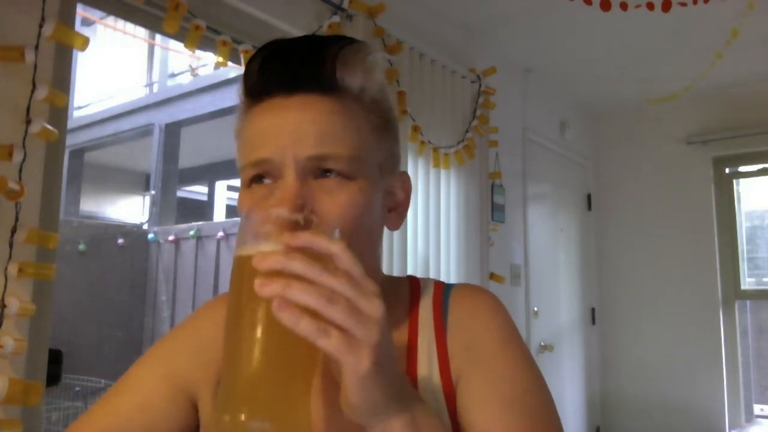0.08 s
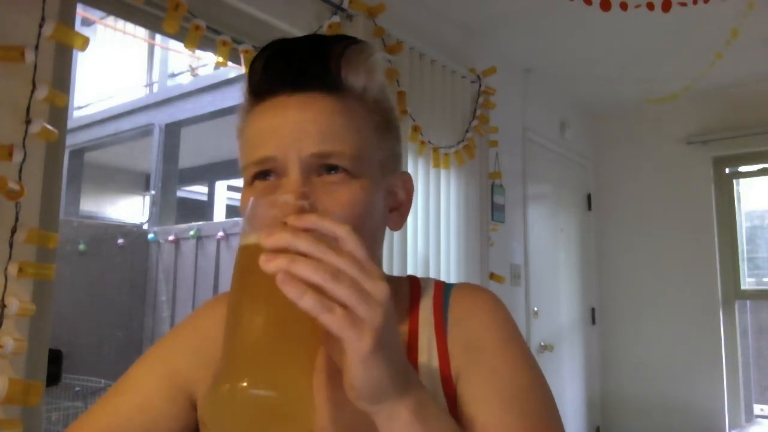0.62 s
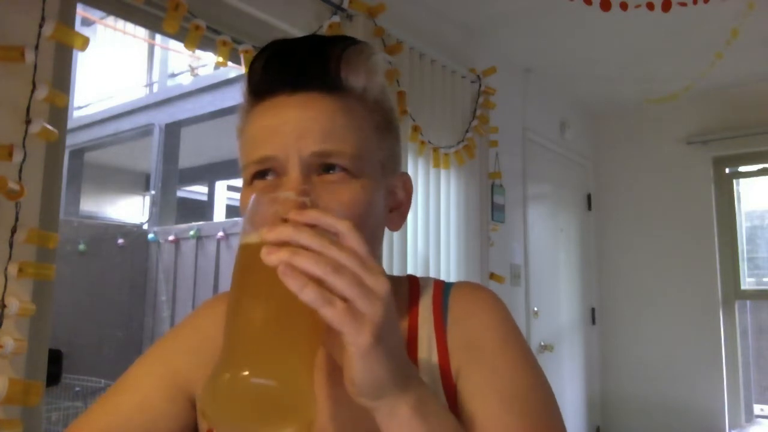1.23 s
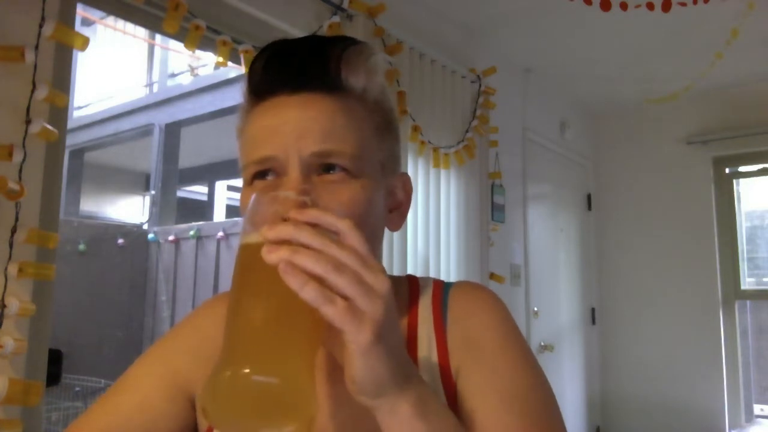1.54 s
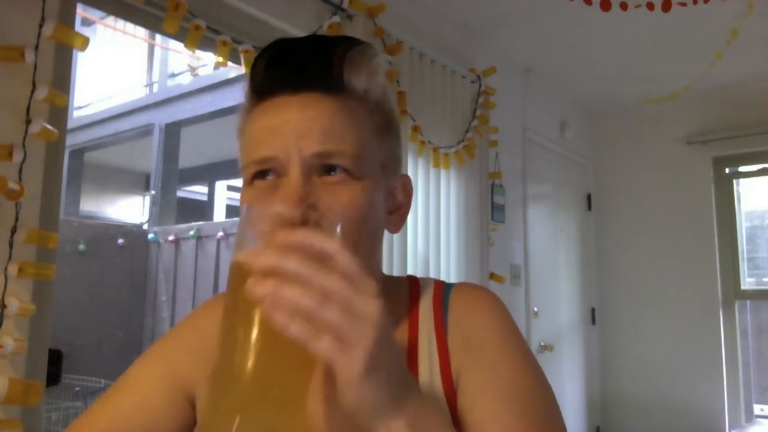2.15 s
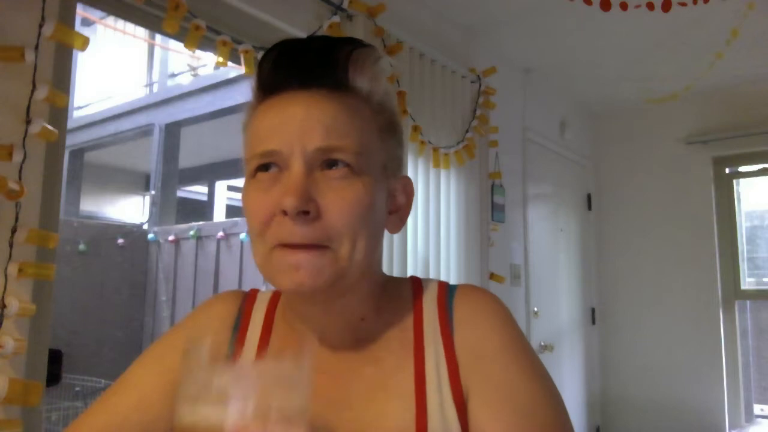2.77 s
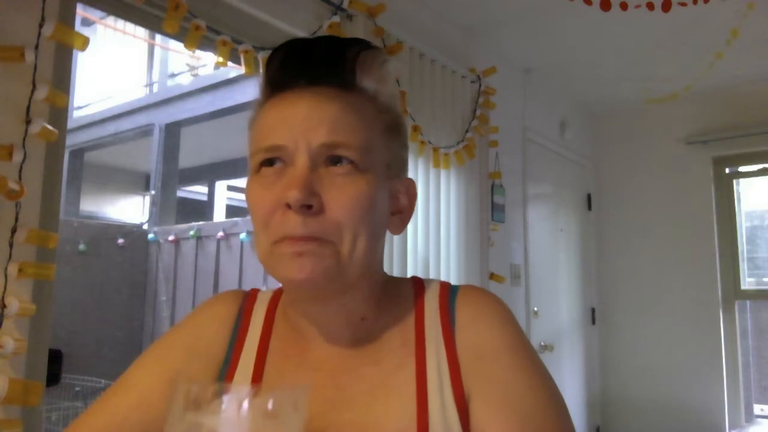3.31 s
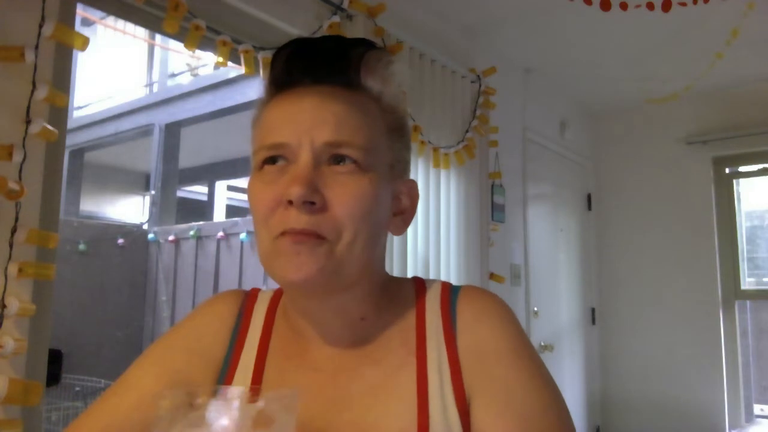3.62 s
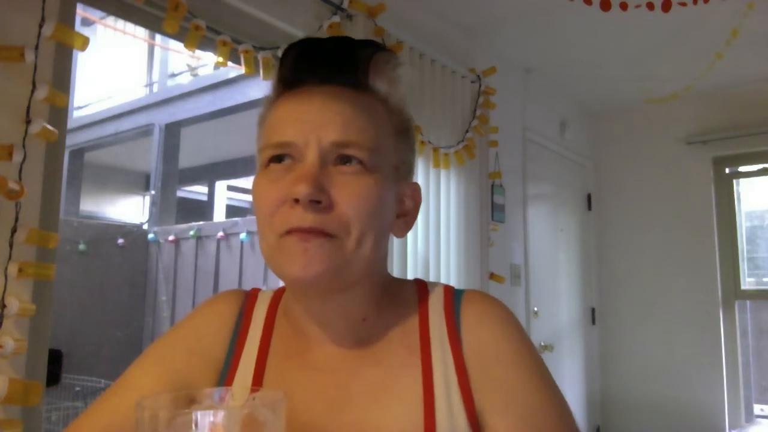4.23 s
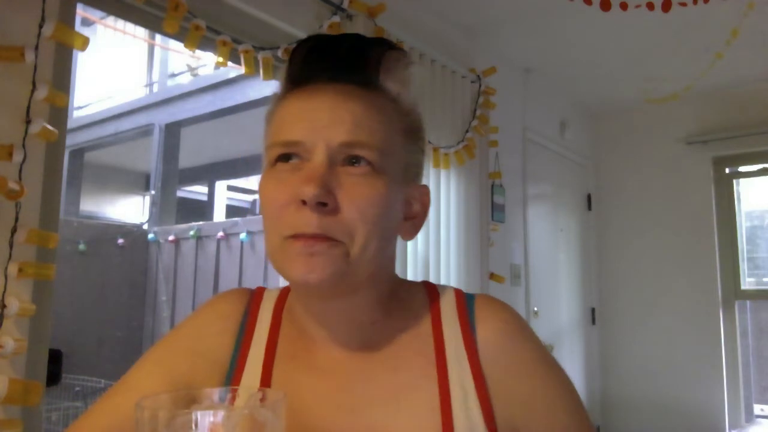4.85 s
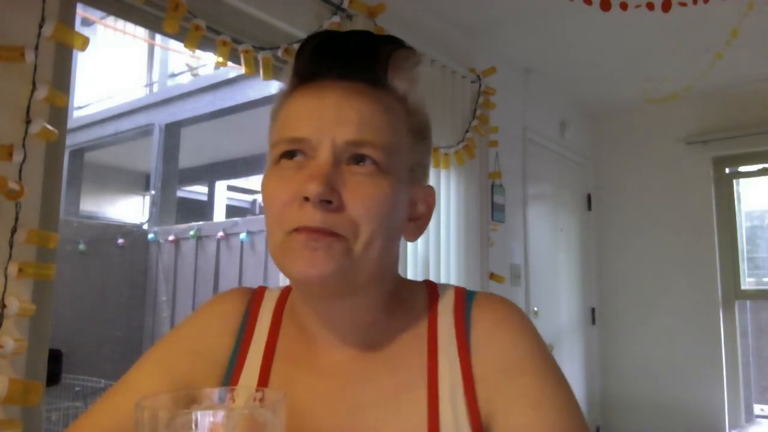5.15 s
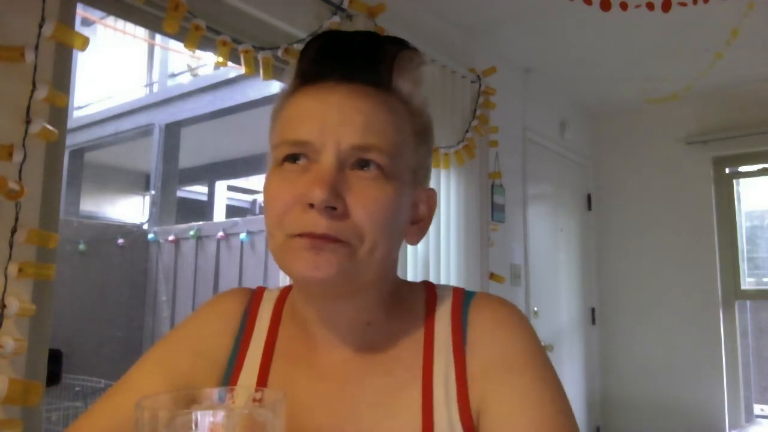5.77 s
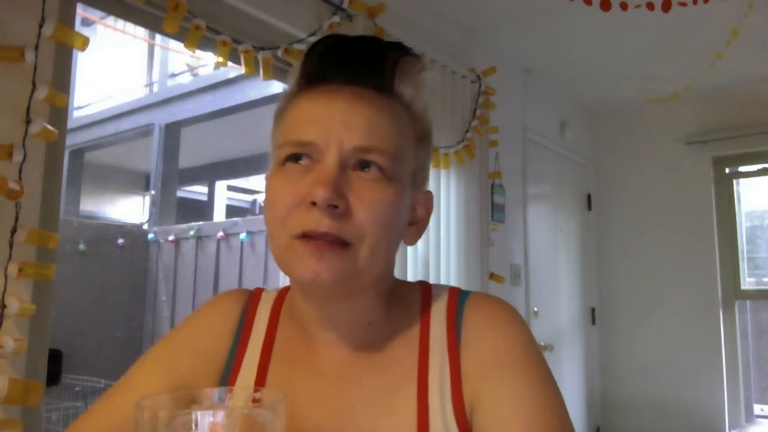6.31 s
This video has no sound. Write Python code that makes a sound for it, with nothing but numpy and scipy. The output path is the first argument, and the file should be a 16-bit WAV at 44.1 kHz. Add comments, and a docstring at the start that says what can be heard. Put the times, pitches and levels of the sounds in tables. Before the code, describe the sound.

A small computer fan whirs softly in a quiet room, with a very faint, high electronic whine. About three seconds in, a full drinking glass is set down on a wooden table with one loud, sharp knock, briefly overloading the nearby microphone. The tabletop rings for an instant and the room answers briefly. The fan carries on, and near the end comes one tiny, very high tick.

```python
"""A quiet room, heard from a computer's microphone close to a table top.
From the start a small fan whirs and the electronics whine faintly, held down a little by a noise gate.
About three seconds in, a full drinking glass is set down once, close by. The blow runs through the top as
a bending wave, briefly overloads the microphone and opens the gate; the glass clicks, the room answers
and the top rings. The gate closes again, and near the end comes one tiny, very high tick."""
import sys
import numpy as np
from scipy import signal
from scipy.fft import rfft, irfft
from scipy.io import wavfile

SR = 44100
rng = np.random.default_rng(int(sys.argv[2]) if len(sys.argv) > 2 else 0)


def materialize(psi):
    """Save the field psi as 16-bit PCM at rate SR to the path in sys.argv[1].

    A 1-D psi becomes a single channel; in a 2-D psi each row is a channel.
    """
    bounded = np.clip(np.atleast_2d(psi).T, -1, 1)
    quanta = np.round(bounded * 32767).astype(np.int16)
    wavfile.write(sys.argv[1], SR, quanta)


N = 290574
KNOCK_S = 3.11515  # the glass meets the table


def undb(db):
    """Decibels to gain."""
    return 10 ** (np.asarray(db) / 20)


def curve_at(points, hz):
    """A table of (pitch_hz, value) joined by straight lines on a log-frequency axis."""
    pitch_hz, value = np.transpose(points)
    return np.interp(np.log(np.maximum(hz, 1)), np.log(pitch_hz), value)


def bins(x):
    """Frequencies of the spectrum of x."""
    return np.fft.rfftfreq(len(x), 1 / SR)


def coloured_noise(points):
    """Noise with a spectrum of (pitch_hz, level_db)."""
    white = rng.standard_normal(N)
    return irfft(rfft(white) * undb(curve_at(points, bins(white))), N)


def at_rms(x, db):
    """Set the rms level."""
    return x * undb(db) / np.std(x)


def since(start_s):
    """Seconds gone by since start_s, zero before."""
    return np.maximum(np.arange(N) / SR - start_s, 0)


def fade(t, t60_s):
    """Free decay, 60 dB in t60_s."""
    return np.exp(-np.log(1000) * t / t60_s)


def ring(modes, t):
    """Decaying modes; neighbours move in opposite senses."""
    return sum((-1) ** k * undb(db) * np.sin(2 * np.pi * hz * t) * fade(t, t60_s)
               for k, (hz, db, t60_s) in enumerate(modes))


# Spectrum of the fan's rush of air: pitch_hz, relative_db
FAN_AIR = [(30, -26), (60, -16), (110, -6), (300, 0), (450, -.5), (800, -3.5), (1120, -2), (1450, -5),
           (1900, 1), (2800, -5), (3800, -5), (6000, -16.5), (10500, -27.5), (15000, -26)]
# The fan's tones, blade tone first: cycles_per_turn
FAN_TONES = (3, 12, 19, 25, 26, 29, 30, 36)


def fan(shaft_hz=98.6, wander=0.000998, blade_db=-73.5, fall_db_per_octave=0.7, air_db=-55):
    """A small fan's rushing air, with tones that waver together as the shaft speed drifts."""
    knots = rng.standard_normal(N // 8000)
    drift = np.interp(np.linspace(0, len(knots) - 1, N), np.arange(len(knots)), knots)
    turns = shaft_hz * np.cumsum(1 + wander * drift) / SR
    tones = np.zeros(N)
    for order in FAN_TONES:
        tone_db = blade_db - fall_db_per_octave * np.log2(order / FAN_TONES[0])
        tones += undb(tone_db) * np.sqrt(2) * np.sin(2 * np.pi * (order * turns + rng.random()))
    return at_rms(coloured_noise(FAN_AIR), air_db) + tones


# Thin whine of the computer's electronics: pitch_hz, relative_db
WHINE_TONES = [(10072, -99), (13291, -96), (13620, -97.5), (14809, -97)]


def electronics(gain_db=6.0, hiss_hz=13380, hiss_width_hz=110, hiss_db=-90):
    """The computer's own steady, very faint tones and a narrow band of hiss high in the treble."""
    t = since(0)
    whine = sum(undb(db + gain_db) * np.sqrt(2) * np.sin(2 * np.pi * hz * t) for hz, db in WHINE_TONES)
    white = rng.standard_normal(N)
    band = np.exp(-.5 * ((bins(white) - hiss_hz) / hiss_width_hz) ** 2)
    return whine + at_rms(irfft(rfft(white) * band, N), hiss_db)


# Force of the glass base on the wood: pitch_hz, relative_db
BLOW_SPECTRUM = [(40, -42), (100, -23), (200, -9), (400, 1), (780, -3), (1100, -13), (1750, -10.5),
                 (2250, -34), (2850, -42.5), (3900, -49), (15000, -83)]


def bending_wave(peak_db=1.5, travel_s=.0022, at_hz=1000, front_s=.0016, rise_s=.00013):
    """Speed in the top grows with the root of frequency: the blow reaches the mic as a falling chirp."""
    hz = np.fft.rfftfreq(N, 1 / SR)
    phase = 2 * np.pi * (hz * KNOCK_S + 2 * travel_s * np.sqrt(at_hz * hz))
    wave = irfft(undb(curve_at(BLOW_SPECTRUM, hz)) * np.exp(-1j * phase), N)
    wave *= 1 - np.exp(-since(KNOCK_S + front_s) / rise_s)  # nothing outruns the fastest wave
    return -undb(peak_db) * wave / np.abs(wave).max()  # the top is pushed down


# Modes of the glass, choked by the hand and the drink: pitch_hz, relative_db, t60_s
GLASS_MODES = [(2840, -13.5, 0.0089), (3569, -29, 0.013), (4368, -32.5, 0.0097), (5320, -32, .01),
               (6437, -49.5, 0.012), (7500, -52, 0.011), (8300, -47, .03)]


def glass_click(lag_s=.0016, gain_db=1, contact_s=.00015):
    """Close to the microphone, the held glass gives only a dry click, softened by the give of the wood."""
    t = since(KNOCK_S + lag_s)
    return undb(gain_db) * ring(GLASS_MODES, t) * (1 - np.exp(-t / contact_s))


# Spectrum of the room's answer: pitch_hz, relative_db
ROOM_SPECTRUM = [(50, -25.5), (130, -5), (400, 1), (700, -3.5), (1200, -7.5), (1800, -6), (2200, -18),
                 (3000, -17), (5000, -24), (9000, -43), (15000, -47)]
# Reverberation time of the room: pitch_hz, t60_s
ROOM_DECAY = [(100, 0.3), (500, .25), (1500, .21), (3000, 0.1), (10000, .08)]


def room(tail_db=-29, build_s=0.0034, echo_s=.071, echo_db=-42, echo_width_s=.019, echo_top_hz=1100):
    """Dense reflections that lose their treble first, and a later, duller cluster from the far walls."""
    t = since(KNOCK_S)
    reflections = at_rms(coloured_noise(ROOM_SPECTRUM), 0)
    spectrum, hz = rfft(reflections), bins(reflections)
    octave = np.round(np.log2(np.maximum(hz, 64)))
    tail = sum(irfft(spectrum * (octave == k), N) * fade(t, curve_at(ROOM_DECAY, 2 ** k))
               for k in np.unique(octave))
    dull = irfft(spectrum / (1 + (hz / echo_top_hz) ** 2), N)
    far_walls = at_rms(dull, echo_db) * np.exp(-.5 * ((t - echo_s) / echo_width_s) ** 2)
    return (undb(tail_db) * tail + far_walls) * (1 - np.exp(-t / build_s))


# Modes of the loaded table top: pitch_hz, relative_db, t60_s
TABLE_MODES = [(91, -40.5, 0.15), (139, -40.5, 0.19), (176, -31.5, 0.164), (221, -29.5, 0.1456),
               (252, -25.5, 0.098), (339.2, -18, 0.11), (397, -25, 0.172), (480.8, -20.5, 0.124),
               (547, -24.5, 0.155), (627.7, -15, 0.053), (689, -30, 0.073), (757, -25.5, 0.084),
               (854, -29.5, 0.13), (1050, -29.5, 0.116), (1200, -30.5, 0.087), (1352, -26.5, 0.062),
               (1434, -36.5, 0.185), (1594, -19, 0.04), (1783, -30, 0.06), (1843, -33, 0.13),
               (2851, -39.5, 0.037)]


def table_ring(lag_s=.00695, gain_db=-1.0, build_s=.0004):
    """Waves thrown back by the edges settle into the modes of the top, close to the microphone."""
    t = since(KNOCK_S + lag_s)
    return undb(gain_db) * ring(TABLE_MODES, t) * (1 - np.exp(-t / build_s))


def tick(start_s=6.2052, level_db=-50, pitch_hz=15200, t60_s=.018):
    """A pinpoint ring at the top of hearing."""
    t = since(start_s)
    return undb(level_db) * np.sin(2 * np.pi * pitch_hz * t) * fade(t, t60_s)


def scene():
    """At the microphone, in mono: the close knock and its room over the computer's noise, then the tick."""
    knock = bending_wave() + glass_click() + room() + table_ring()
    return (knock + fan() + electronics() + tick())[None]


def noise_gate(x, open_db=-30, depth_db=4, hold_s=0.1, release_s=0.11):
    """Turns quiet sound down a little; a loud sound opens it at once, then it closes slowly."""
    t = since(0)
    last_loud_s = np.maximum.accumulate(np.where(np.abs(x) > undb(open_db), t, -10))
    opening = np.exp(-np.maximum(t - last_loud_s - hold_s, 0) / release_s)
    return x * undb(-depth_db * (1 - opening))


def record(dry, low_cut_hz=62, knee=9, high_cut_hz=15700):
    """The computer's microphone input: gate, bass cut, peaks rounded off at full scale, treble cut."""
    low_cut = signal.butter(2, low_cut_hz, "high", fs=SR, output="sos")
    high_cut = signal.ellip(10, .1, 60, high_cut_hz, fs=SR, output="sos")
    thin = signal.sosfilt(low_cut, noise_gate(dry[0]))
    clipped = thin / (1 + np.abs(thin) ** knee) ** (1 / knee)
    return signal.sosfilt(high_cut, clipped)[None]


dry = scene()
out = record(dry)
materialize(out)
```